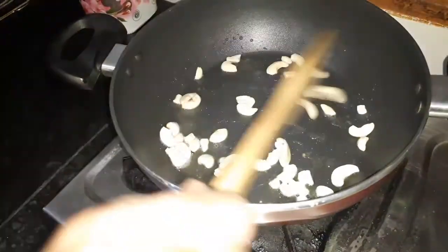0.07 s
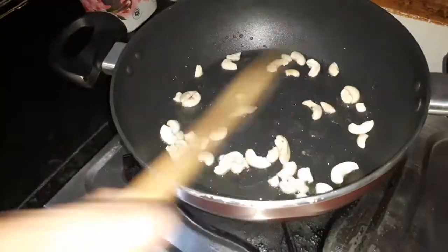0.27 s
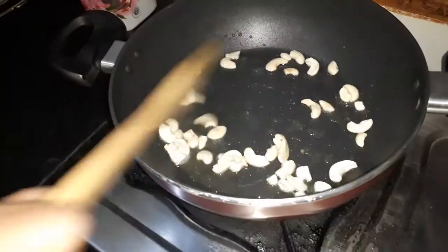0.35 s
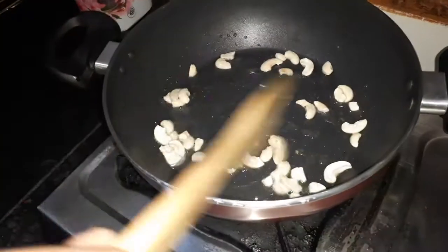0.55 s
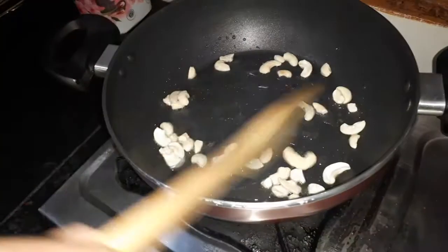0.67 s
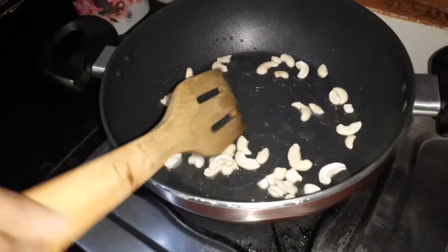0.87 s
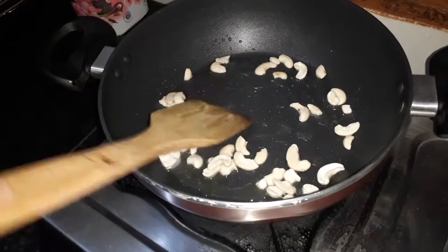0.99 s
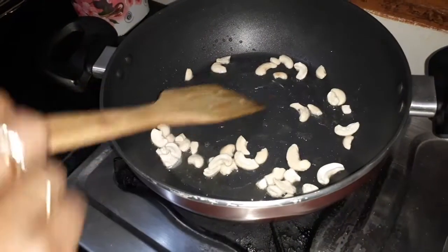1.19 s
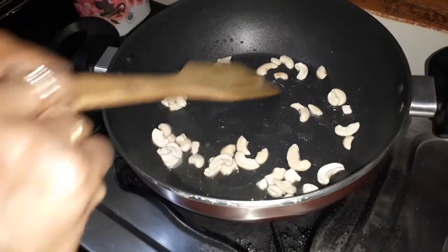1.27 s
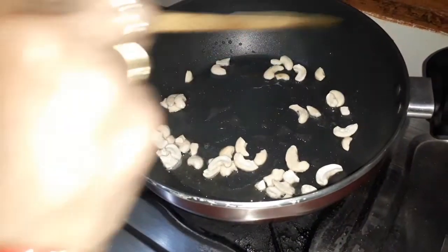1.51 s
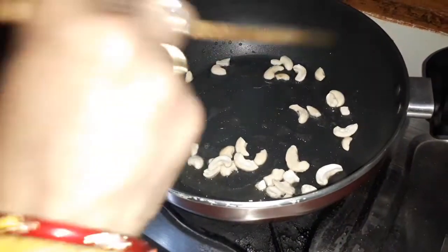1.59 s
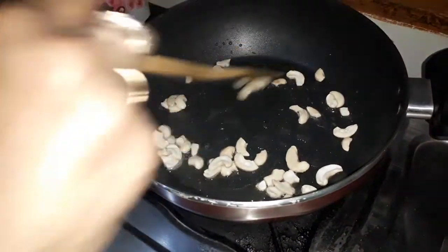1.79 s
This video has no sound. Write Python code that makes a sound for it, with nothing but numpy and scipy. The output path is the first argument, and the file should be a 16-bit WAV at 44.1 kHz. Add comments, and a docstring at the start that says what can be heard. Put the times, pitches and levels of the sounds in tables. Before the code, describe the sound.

Wooden spatula scraping and clacking nuts around a metal pan in short strokes, fat sizzling quietly

```python
"""Stirring cashews in a pan

A wooden spatula stirs cashews frying in a little fat, close by in a small kitchen.
Spatula and nuts knock on the pan (damped tones and noise bursts) and ring its modes.
The strokes scrape on as coloured streams of tiny slips, while nuts click about as short ticks.
Last, the blade rubs softly along the pan wall: slips through a few broad resonances.
Throughout, the fat sizzles faintly (shaped noise, random spits, single pops) over a low hum.
"""
import sys
import numpy as np
from scipy import signal
from scipy.fft import rfft, irfft
from scipy.io import wavfile

SR = 44100
rng = np.random.default_rng(int(sys.argv[2]) if len(sys.argv) > 2 else 0)


def wav_out(sig):
    """Save sig, one row per channel (or a flat mono array), as 16-bit PCM at SR to the path in sys.argv[1]."""
    wavfile.write(sys.argv[1], SR, np.round(np.clip(np.atleast_2d(sig).T, -1, 1) * 32767).astype(np.int16))


N = 81585  # length in samples

# Fat sizzle, spectrum of the fizz: f/Hz, relative density/dB per Hz
FIZZ_COLOUR = [(15, -68), (25, 3), (58, -22), (88, -5), (123, -6), (208, -12), (237, -16), (833, -23.5),
               (1200, -17), (1370, -10), (1650, -19.5), (2030, -17.5), (2570, -20.5), (2850, -19),
               (3610, -13), (4000, -10.5), (7120, -18), (10500, -14.5), (13000, -17)]
# Spectrum of one spit or pop: f/Hz, relative level/dB
SPIT_COLOUR = [(1000, -26), (3000, -6.5), (4300, -3), (7500, -16), (11500, 1), (14000, -2)]
# Single pops of the fat: t/s, level/dB
POPS = [(.682, -28), (.98, -25), (1.434, -30), (1.749, -29), (1.797, -31)]
# Stereo spread of the sizzle: f/Hz, side against mid/dB
SIZZLE_WIDTH = [(20, -30), (3400, -54), (4200, -26.5), (5000, -4), (8000, -1), (12000, -4.5)]
FIZZ_DB, SPIT_DB, SPITS_PER_S, SPIT_SPREAD_DB = -57, -63, 370, 2.3
HUM_HZ, HUM_WIDTH_HZ, HUM_DB = 102.3, 8.2, -75

# Decay of the room tail: f/Hz, t60/s
ROOM_T60 = [(100, 0.74), (400, 0.43), (1000, 0.9), (4000, 0.82), (13000, 0.35)]
TAIL_DB, ROOM_TREBLE_DB = -10.5, -6
EARLY_DB, EARLY_DECAY_S, EARLY_PER_S = -4.5, 0.012, 2000

# Blade rubbing on the wall: t/s, low body level/dB, middle resonance level/dB, upper resonance level/dB
RUB_CURVE = [(1.36, -86, -63.5, -58), (1.39, -66, -58.5, -73), (1.415, -66.5, -50, -59),
             (1.435, -53.5, -52, -55.5), (1.49, -50, -46.5, -52.5), (1.54, -50.5, -49.5, -41),
             (1.57, -59, -51.5, -41.5), (1.585, -53.5, -55, -43), (1.63, -54, -75, -53.5),
             (1.68, -62, -76, -68), (1.76, -73, -92, -108), (1.83, -82, -95, -86)]
# Spectrum of the rub's low body: f/Hz, relative level/dB
RUB_BODY_COLOUR = [(90, -21), (140, -9), (230, -21.5), (340, -13), (412, 2.5), (470, -6.5), (600, -4.5),
                   (740, -1), (900, -21), (1080, -17), (1400, -25)]
# Upper resonances of the rub: f/Hz, width/Hz, relative level/dB
RUB_UPPER_MODES = [(1358, 20, -8), (1435, 102, -4), (1700, 120, -17.5), (2240, 730, -12),
                   (3570, 1500, -14.5), (4480, 600, -25)]
RUB_MID_HZ, RUB_MID_WIDTH_HZ, RUB_HISS_DB = 841, 188, -32

# Nuts clicking on pan and blade: t/s, tick level/dB, ring f/Hz, ring level/dB
NUT_CLICKS = [(0.212, -22, 3580, -38.5), (0.2756, -21, 5450, -32), (.2803, -18, 4750, -29.5),
              (.292, -26, 4930, -43), (.319, -26, 4840, -32), (0.3642, -23.5, 4800, -51),
              (0.4887, -43, 4180, -30), (.508, -27, 5640, -35), (0.515, -19, 4320, -39),
              (.567, -20, 3440, -36.5), (.634, -35, 1470, -38), (0.744, -14.5, 3760, -38),
              (.767, -18.5, 4390, -31), (0.786, -42, 4100, -28.5), (0.862, -29, 1340, -32.5),
              (1.0211, -17, 3470, -38.5), (1.029, -14.5, 3856, -57)]
# Spectrum of a nut's tick: f/Hz, relative level/dB
NUT_COLOUR = [(200, -40), (1000, 4.5), (2200, -9.5), (5000, 3), (8500, 1.5), (11500, 10.5), (14000, -12)]
NUT_DECAY_S, NUT_RISE_S, NUT_RING_DECAY_S = 0.0036, 0.00035, 0.0031

# Scraping strokes, one curve each: t/s, rasp level/dB, pan drone level/dB
STROKE_CURVES = [
    [(.205, -46.5, -47), (.22, -59.5, -50.5), (.232, -40, -43), (.262, -42.5, -47.5), (.292, -34, -52.5),
     (.316, -39.5, -62), (.328, -50, -51), (.37, -52, -61), (.39, -70, -56)],
    [(.484, -56, -50), (.496, -41.5, -33), (.52, -38.5, -45), (.55, -43, -40.5), (.57, -40.5, -45),
     (.58, -54.5, -67), (.64, -57, -54.5), (.7, -64, -63.5)],
    [(.724, -39.5, -45), (.75, -35.5, -35.5), (.772, -39, -36.5), (.795, -38.5, -45.5), (.808, -46.5, -36),
     (.83, -49, -38), (.86, -48, -49), (.9, -72, -61)],
    [(1.019, -53, -58), (1.024, -50, -40.5), (1.042, -43.5, -47), (1.056, -57, -69), (1.086, -45.5, -51),
     (1.132, -51, -46.5), (1.15, -55.5, -63), (1.22, -57.5, -67), (1.26, -77, -50.5)],
]
# Spectrum of each stroke's rasp: f/Hz, relative density/dB per Hz
RASP_COLOURS = [
    [(710, -28), (1200, -15), (1380, 8.5), (1750, -12), (2080, 0), (2770, -6), (3490, 2), (4430, -5.5),
     (4800, 1.5), (5970, -4.5), (9260, -10), (12000, -4.5), (13000, -16)],
    [(710, -48.5), (1200, -7), (1480, 1.5), (1750, -14), (2020, -7.5), (2200, 2), (2440, -7), (3350, -7.5),
     (5090, -6), (5680, -2.5), (6530, -12), (11400, -8.5), (13000, -12.5)],
    [(710, -18), (1200, 5), (1450, 10.5), (1820, -0.5), (1920, 5), (2250, 7.5), (3350, -2), (4170, 4),
     (4990, -0.5), (6150, -6), (9640, -16.5), (10700, -4.5), (13000, -15)],
    [(710, -51.5), (1200, -4), (1480, 13), (1840, 2.5), (3220, -1.5), (3590, 12), (4340, 0), (4560, 4),
     (8550, -2.5), (11300, 4), (13000, -9)],
]
# Spectrum of each stroke's drone: f/Hz, relative density/dB per Hz
DRONE_COLOURS = [
    [(47, -3), (80, 5), (257, -2.5), (403, 7), (480, 0), (691, 6.5), (1130, -14.5), (1380, 6.5), (1600, -3),
     (2080, -67), (3520, -120)],
    [(47, -52), (80, -11.5), (172, -11.5), (270, -8.5), (347, 4), (641, -13.5), (745, 0), (1020, -10.5),
     (1600, -7), (2080, -51), (3520, -120)],
    [(47, -75), (80, -11.5), (210, 4), (388, 2.5), (524, 17), (793, -6), (866, 11), (981, -2.5),
     (1600, -19.5), (2080, -49), (3520, -120)],
    [(47, -32), (80, -19), (150, -17), (215, -16), (263, -18.5), (403, -4.5), (594, -15), (726, 2),
     (957, -22.5), (1600, -11), (2080, -25.5), (3520, -120)],
]
# Bright resonances that colour every rasp: f/Hz, width/Hz, relative level/dB
RASP_MODES = [(2187, 63, 2), (3420, 55, -1), (4050, 58, 8), (4642, 240, 14), (4944, 67, 1), (5890, 69, 2)]
SLIPS_PER_S, SLIP_SPREAD_DB, CHATTER_DB, CHATTER_S = 3000, 3, 0.7, 0.0037
SCRAPE_RING_DB = -14  # pan ring against the drone
RASP_RING_DB = -14  # bright modes against the rasp

# Modes of the pan: f/Hz, t60/s, relative level struck on the base/dB, relative level struck on the wall/dB
PAN_MODES = [(106.3, 0.26, -10.5, -38), (231.2, 0.66, -27, -8.5), (294, 0.23, -19, -8),
             (339.7, 0.41, -10, -31), (381.4, 0.41, -27, -4.5), (407.3, 0.53, -9.5, -10),
             (521, 0.98, -26, -15.5), (548.5, 0.88, -20, -13.5), (591, 0.35, -15.5, -7),
             (677, 0.11, -23, -1.5), (745.3, 0.48, -1.5, -11), (876, 0.41, -31, 3), (960, 0.39, -19, -24),
             (1334, 0.057, -20, 10), (1470, 0.1, 0, -14), (2140, 0.51, -37, -19), (2360, .3, -54, -18),
             (3478, 0.11, -40, -9), (4200, 0.56, -24.5, -27), (4834, 0.35, -43, -16)]
RING_RISE_S = 0.001

# Knocks of spatula and nuts: t/s, clack level/dB, clack f/Hz, dull thump level/dB, crack level/dB,
# pan base ring level/dB, pan wall ring level/dB
KNOCKS = [(0.2037, -33, 647, -40.5, -48, -79, -76), (.229, -41, 487, -40, -54, -59, -82),
          (.311, -42, 815, -53, -45, -81, -73), (.3635, -48, 700, -67, -21, -60, -58),
          (0.4817, -26.5, 720, -35, -20.5, -44.5, -65), (0.5896, -31.5, 790, -67, -27.5, -52.5, -58),
          (0.7209, -22.5, 832, -31.5, -3, -52, -30.5), (.7345, -30, 423, -33, -32, -56, -54.5),
          (0.9317, -19.5, 760, -53, -27, -35.5, -47), (1.0205, -68, 696, -41.5, -50, -63, -64),
          (1.234, -47, 838, -73, -56, -62.5, -62.5)]
# Spectrum of a knock's crack: f/Hz, relative level/dB
CRACK_COLOUR = [(60, -27), (200, -21), (350, -9), (900, -34), (1350, -7), (1800, -6), (2500, 8.5),
                (3000, -4.5), (3550, 9), (4500, -13.5), (7000, -5.5), (13000, -16.5)]
CLACK_PEAK_S, CRACK_DECAY_S, CRACK_RISE_S = 0.0014, 0.0031, 0.0018
THUMP_HZ, THUMP_PEAK_S = 333, 0.0036

# Stereo spread of the stirring: f/Hz, side against mid/dB
STIRRING_WIDTH = [(20, -70), (3600, -79), (4300, -64), (5200, -29), (8000, -19), (12000, -34)]
LOW_CUT_HZ, BAND_LIMIT_HZ = 60, 13250


def amp(db):
    """Decibels to gain."""
    return 10 ** (np.asarray(db) / 20)


def unit(x):
    """Scales to rms 1."""
    return x / np.sqrt(np.mean(x ** 2) + 1e-20)


def read(points, hz):
    """Reads a table on a log-frequency axis."""
    f, value = np.transpose(points)
    return np.interp(np.log(hz + 1), np.log(f + 1), value)


def level(curve, axis):
    """One dB column of a time curve as gain, practically silent outside it."""
    rows = np.array(curve)
    t = np.arange(N) / SR
    return amp(np.interp(t, rows[:, 0], rows[:, axis], left=-200, right=-200))


def add(mix, s, sound):
    """Mixes a sound in at a time in seconds."""
    part = mix[round(s * SR):][:len(sound)]
    part += sound[:len(part)]


def colour(x, points, size=4096):
    """Causal minimum-phase filter of unit energy with the given spectrum."""
    hz = abs(np.fft.fftfreq(size, 1 / SR))
    log_gain = np.log(amp(read(points, hz)))
    spectrum = np.exp(np.conj(signal.hilbert(log_gain)))
    taps = np.fft.ifft(spectrum).real[:size // 2]
    return signal.fftconvolve(x, taps / np.linalg.norm(taps))[:len(x)]


def resonate(x, hz, width):
    """A steep resonance at rms 1: shifts hz to zero, smooths with a double pole, shifts back."""
    turn = np.exp(2j * np.pi * hz * np.arange(len(x)) / SR)
    r = np.exp(-np.pi * width / SR)
    smoothed = signal.lfilter([1], [1, -2 * r, r * r], x / turn)
    return unit((turn * smoothed).real)


def clicks(per_s, spread_db):
    """Random clicks of uneven size and sign, at rms 1."""
    size = amp(spread_db * np.minimum(rng.exponential(1, N), 4))
    sign = rng.choice([-1, 1], N)
    return unit(size * sign * (rng.random(N) < per_s / SR))


def friction():
    """Tiny slips whose strength wavers with the chatter of the blade."""
    window = np.hanning(max(int(2 * CHATTER_S * SR), 3))
    chatter = unit(signal.oaconvolve(rng.standard_normal(N), window, "same"))
    return unit(clicks(SLIPS_PER_S, SLIP_SPREAD_DB) * amp(CHATTER_DB * chatter))


def burst(decay_s, rise_s, points, size=4096):
    """A sharp contact: a dense cluster of modes dying at once, unit energy."""
    t = np.arange(size) / SR
    envelope = (1 - np.exp(-t / rise_s)) * np.exp(-t / decay_s)
    x = colour(rng.standard_normal(size) * envelope, points)
    return x / np.linalg.norm(x)


def damped(hz, peak_s):
    """A few cycles that swell until peak_s and die."""
    t = np.arange(SR // 10) / SR
    return t / peak_s * np.exp(1 - t / peak_s) * np.sin(2 * np.pi * hz * t)


def sizzle():
    """Fat fizzes, spits and now and then pops, over a low kitchen hum."""
    fizz = amp(FIZZ_DB) * colour(rng.standard_normal(N), FIZZ_COLOUR)
    spits = amp(SPIT_DB) * clicks(SPITS_PER_S, SPIT_SPREAD_DB)
    for s, db in POPS:
        add(spits, s, amp([db]))
    # The first second is dropped so that the hum has already built up
    hum = resonate(rng.standard_normal(N + SR), HUM_HZ, HUM_WIDTH_HZ)[SR:]
    return fizz + colour(spits, SPIT_COLOUR) + amp(HUM_DB) * hum


def kitchen(x):
    """Quick reflections from pan, stove and wall, then a short room tail."""
    t = np.arange(SR) / SR
    # Tail: noise that dies at its own rate in each band
    hz, at, z = signal.stft(rng.standard_normal(SR) * (t > .012), SR, nperseg=256)
    decay = amp(-60 * at / read(ROOM_T60, hz)[:, None])
    tail = signal.istft(z * decay, SR, nperseg=256)[1][:SR]
    # Early part: sparse reflections of either sign
    hits = rng.choice([-1, 1], SR) * (rng.random(SR) < EARLY_PER_S / SR)
    early = hits * (t > .004) * np.exp(-t / EARLY_DECAY_S)
    echo = amp(TAIL_DB) * tail / np.linalg.norm(tail) + amp(EARLY_DB) * early / np.linalg.norm(early)
    treble_loss = [(1500, 0.0064), (8000, ROOM_TREBLE_DB)]  # f/Hz, level/dB
    gain = amp(read(treble_loss, np.fft.rfftfreq(2 * SR, 1 / SR)))
    echo = irfft(rfft(echo, 2 * SR) * gain)[:SR]
    return x + signal.fftconvolve(x, echo)[:N]


def rub():
    """The blade glides up the wall: a hollow middle resonance gives way to a higher one."""
    slips = friction()
    body = colour(slips * level(RUB_CURVE, axis=1), RUB_BODY_COLOUR)
    middle = resonate(friction(), RUB_MID_HZ, RUB_MID_WIDTH_HZ)
    upper = sum(amp(db) * resonate(slips, hz, width) for hz, width, db in RUB_UPPER_MODES)
    upper = upper + amp(RUB_HISS_DB) * colour(slips, NUT_COLOUR)  # hiss shares the nuts' spectrum
    return body + middle * level(RUB_CURVE, axis=2) + upper * level(RUB_CURVE, axis=3)


def nuts():
    """Each nut gives a dry tick with a very short ring."""
    out = np.zeros(N)
    t = np.arange(SR // 10) / SR
    for s, tick_db, hz, ring_db in NUT_CLICKS:
        add(out, s, amp(tick_db) * burst(NUT_DECAY_S, NUT_RISE_S, NUT_COLOUR))
        add(out, s, amp(ring_db) * np.exp(-t / NUT_RING_DECAY_S) * np.sin(2 * np.pi * hz * t))
    return out


def pan_ring(axis):
    """Decaying pan modes for one place of contact; neighbouring modes swing against each other."""
    t = np.arange(SR) / SR
    ring = np.zeros(SR)
    for k, mode in enumerate(PAN_MODES):
        hz, t60 = mode[:2]
        ring += (-1) ** k * amp(mode[axis] - 60 * t / t60) * np.sin(2 * np.pi * hz * t)
    return ring * (1 - np.exp(-t / RING_RISE_S))


def scrapes():
    """Slips of blade and nuts rasp on the surface and set the pan droning."""
    rasp, drone = np.zeros(N), np.zeros(N)
    for curve, bright, body in zip(STROKE_CURVES, RASP_COLOURS, DRONE_COLOURS):
        slips = friction()
        rasp += colour(slips * level(curve, axis=1), bright)
        drone += colour(slips * level(curve, axis=2), body)
    low_ring = unit(signal.fftconvolve(drone, pan_ring(axis=2))[:N])
    high_ring = unit(sum(amp(db) * resonate(rasp, hz, width) for hz, width, db in RASP_MODES))
    ringing_drone = drone + amp(SCRAPE_RING_DB) * drone.std() * low_ring
    ringing_rasp = rasp + amp(RASP_RING_DB) * rasp.std() * high_ring
    return ringing_rasp + ringing_drone


def rings():
    """After each knock the modes of base and wall ring on, about as long as the room does."""
    out = np.zeros(N)
    base, wall = pan_ring(axis=2), pan_ring(axis=3)
    for s, *_, base_db, wall_db in KNOCKS:
        add(out, s, amp(base_db) * base + amp(wall_db) * wall)
    return out


def knocks():
    """Wood or a nut lands on metal: a clack, a dull thump of opposite sign and a crack."""
    out = np.zeros(N)
    for s, clack_db, hz, thump_db, crack_db, _, _ in KNOCKS:
        clack = amp(clack_db) * damped(hz, CLACK_PEAK_S)
        thump = amp(thump_db) * damped(THUMP_HZ, THUMP_PEAK_S)
        add(out, s, clack - thump)
        add(out, s, amp(crack_db) * burst(CRACK_DECAY_S, CRACK_RISE_S, CRACK_COLOUR))
    return out


def stirring():
    """Contacts heard in the kitchen, plus the pan's rings; the contacts carry little deep bass."""
    contacts = knocks() + nuts() + scrapes() + rub()
    low_cut = signal.butter(2, LOW_CUT_HZ, "high", fs=SR, output="sos")
    return kitchen(signal.sosfilt(low_cut, contacts)) + rings()


def stereo(source, width):
    """Nearly mono in the bass; a second rendering makes the treble's grain differ between sides."""
    mid = source()
    side_gain = amp(read(width, np.fft.rfftfreq(N, 1 / SR)))
    side = irfft(rfft(source()) * side_gain, N)
    return np.array([mid + side, mid - side])


def scene():
    """The sizzle spread wide, the stirring in the centre."""
    return stereo(sizzle, SIZZLE_WIDTH) + stereo(stirring, STIRRING_WIDTH)


def record(dry):
    """The recorder's band limit: a steep low-pass."""
    low_pass = signal.firwin(401, BAND_LIMIT_HZ, window=("kaiser", 8), fs=SR)
    return signal.oaconvolve(dry, low_pass[None], "same")


dry = scene()
out = record(dry)
wav_out(out)
```